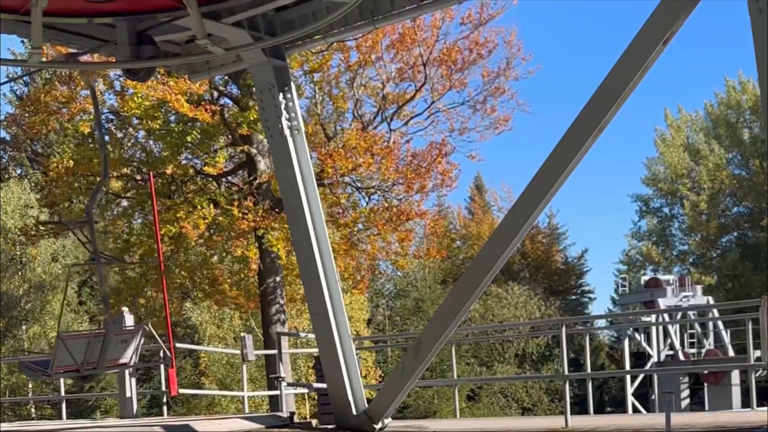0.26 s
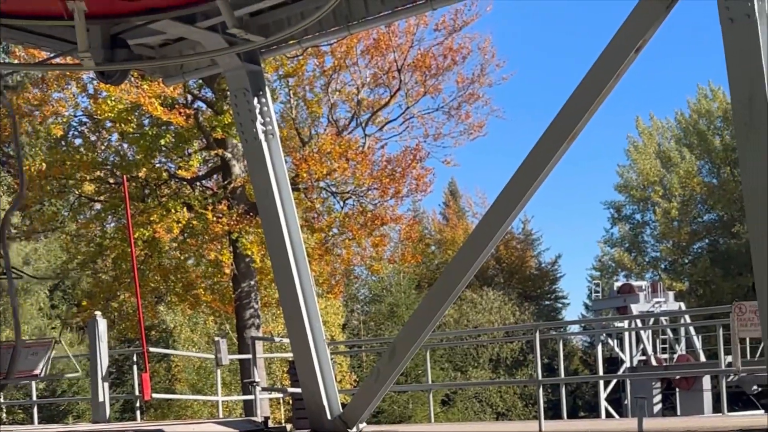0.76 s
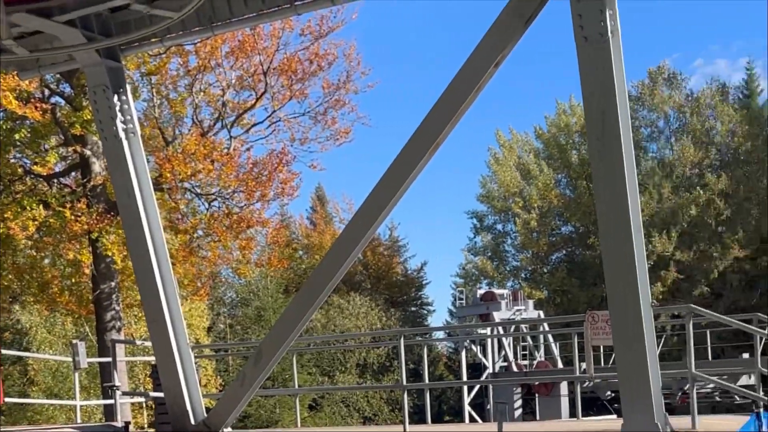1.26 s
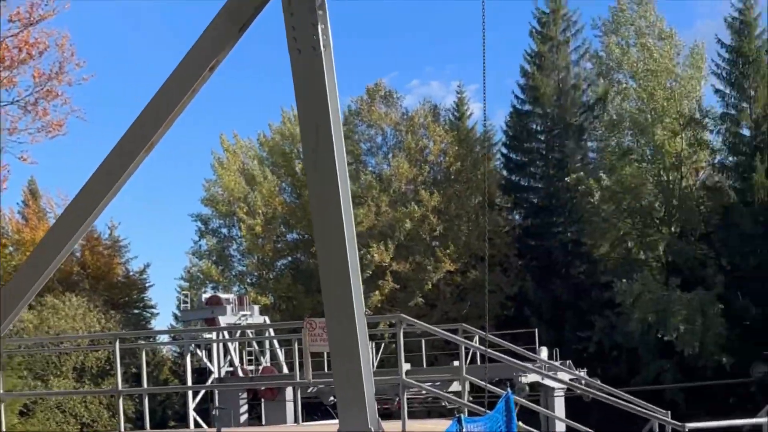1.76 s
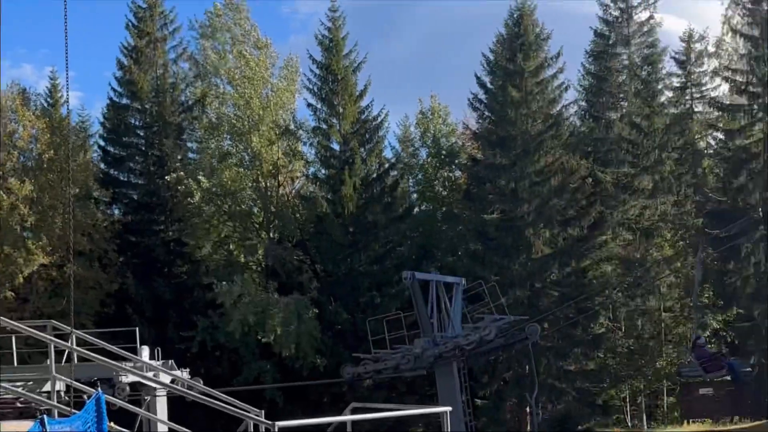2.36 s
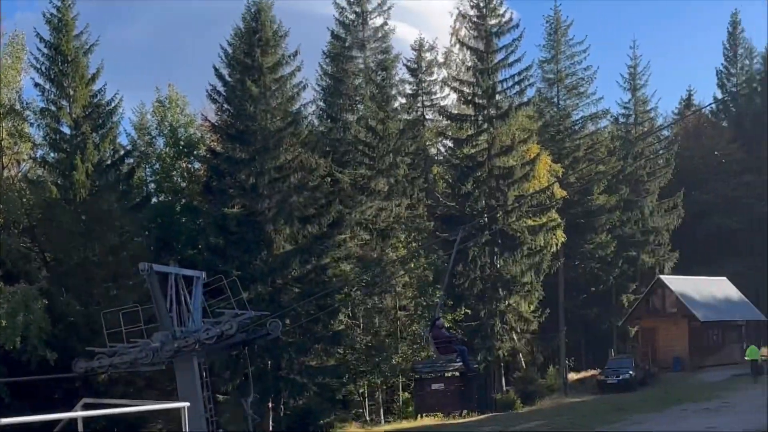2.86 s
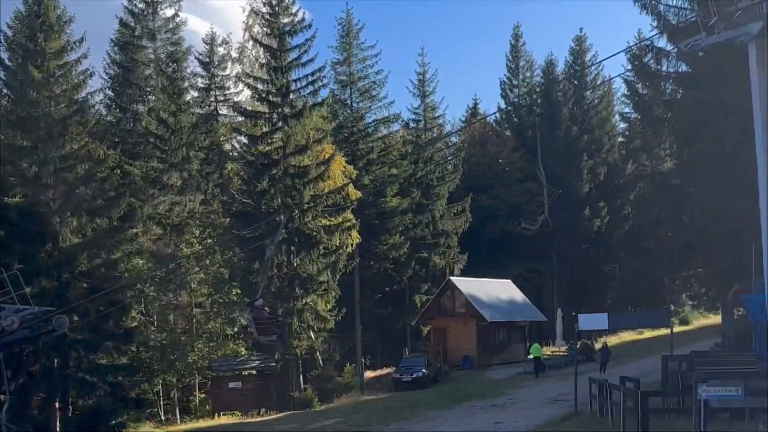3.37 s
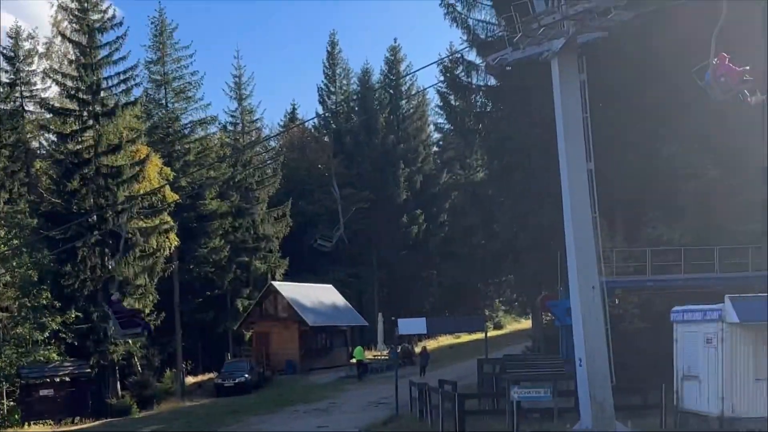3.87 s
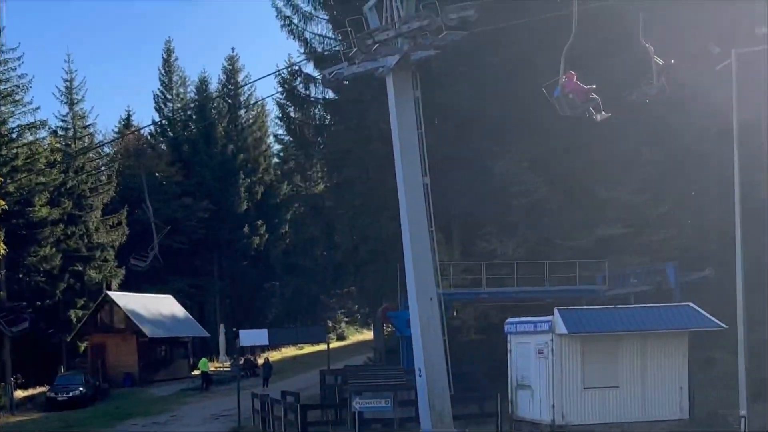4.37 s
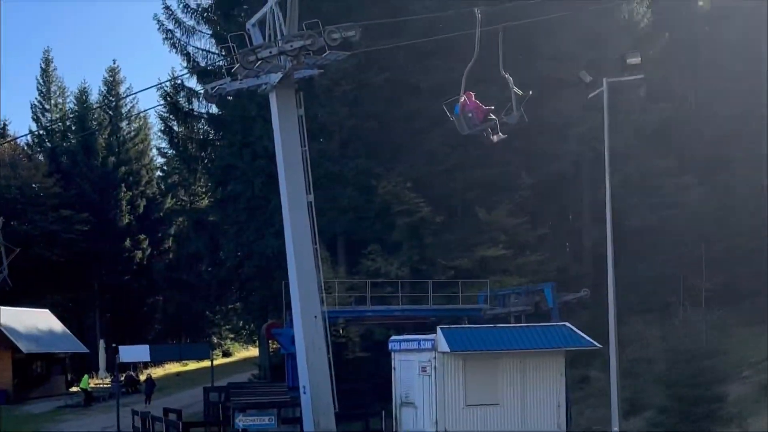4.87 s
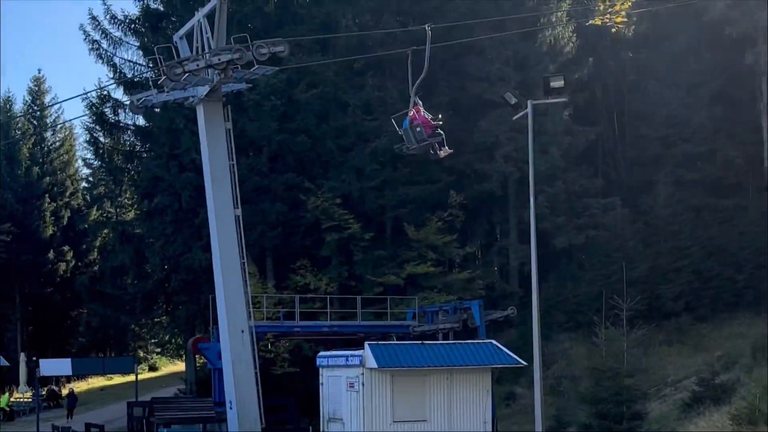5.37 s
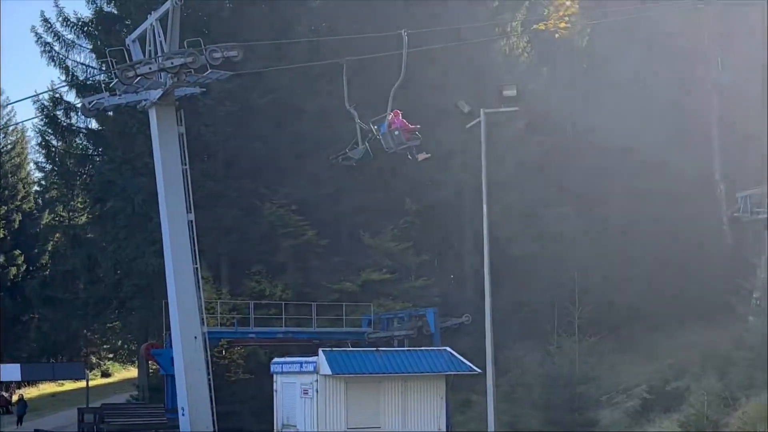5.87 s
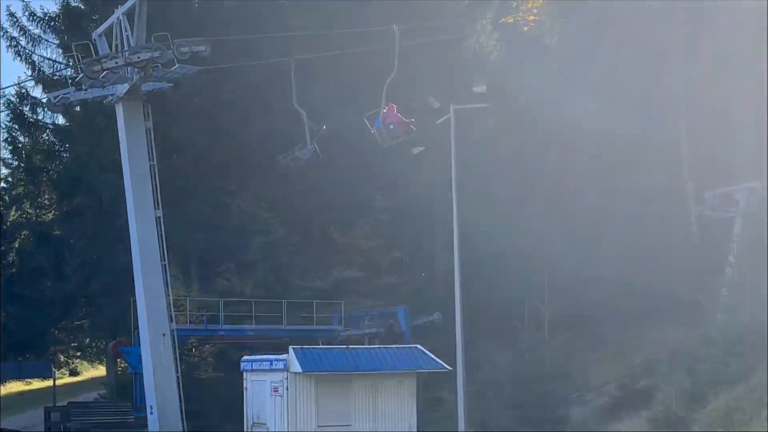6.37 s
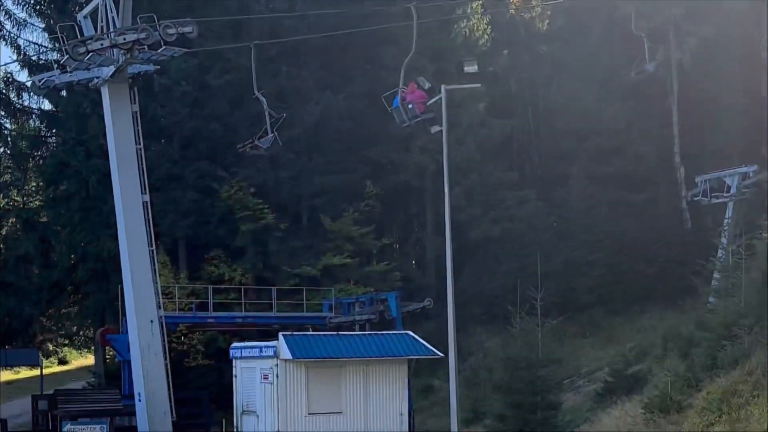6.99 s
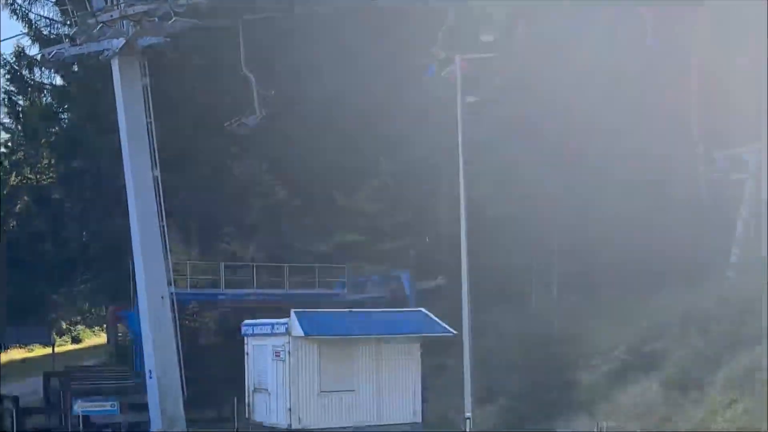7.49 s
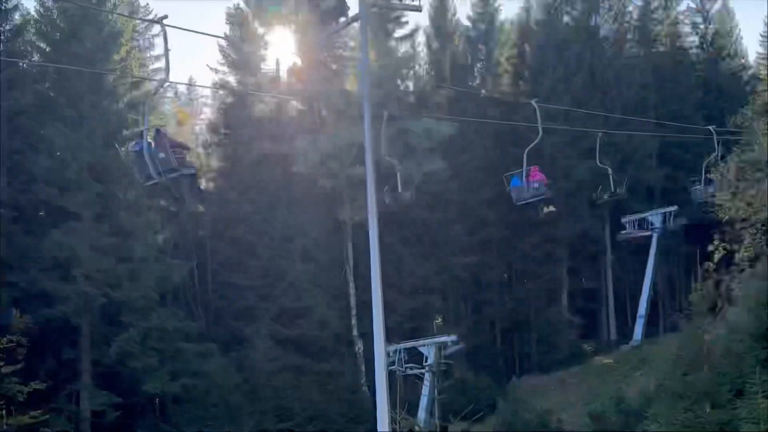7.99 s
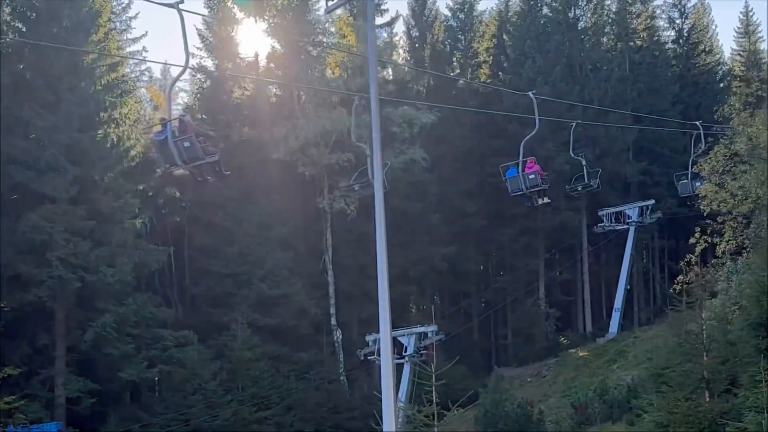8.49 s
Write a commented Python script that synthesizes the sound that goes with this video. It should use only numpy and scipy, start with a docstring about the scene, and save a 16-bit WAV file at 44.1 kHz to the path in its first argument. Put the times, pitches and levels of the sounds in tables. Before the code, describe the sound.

A chairlift motor hums and whirs loudly, shoes scrape grit nearby, then it stops dead with a click, leaving soft rumbling wind.

```python
"""The drive of a chairlift station drones outdoors: sines at multiples of a slowly easing shaft speed.
Steady sines add mains hum and shaped noise adds a broad roar, which dulls as the listener turns away.
Shoes scuff on grit (bursts of noise, ringing pebbles), low wind puffs, and a few short tones squeak.
A hard cut clicks to a spot further off, where lumpy noise makes the wind that buffets both ports.
The two ports are the left and right openings where the sound is picked up."""
import sys
import numpy as np
from scipy import signal
from scipy.fft import rfft, irfft, next_fast_len
from scipy.io import wavfile
from scipy.ndimage import uniform_filter1d, map_coordinates

SR = 44100
rng = np.random.default_rng(int(sys.argv[2]) if len(sys.argv) > 2 else 0)


def master_out(mix):
    """Clip the mix to full scale and print it as 16-bit PCM to the path in sys.argv[1]."""
    frames = np.transpose(np.atleast_2d(mix))
    ceiling = np.clip(frames, -1, 1)
    pcm = np.round(ceiling * 32767).astype(np.int16)
    wavfile.write(sys.argv[1], SR, pcm)


N = 385434

PINION = 4.608  # turns of a faster pinion (small gear) per shaft turn
# how the station's level changes as the listener turns from the drive: (time [s], level change [dB])
TURN = [(0, 0), (.3, -1.5), (1.7, -1), (2.7, -1), (3.4, -0.5), (3.7, -2.5), (4.3, -3.5), (5.0, -4.5),
        (6.5, -5), (7.9, -5)]
# tone colour of airy treble noise: (frequency [Hz], relative level [dB])
AIR = [(3120, -30), (5300, 0.5), (6470, 3), (7840, -2), (9560, -8.5), (10100, -15.5), (11000, -33),
       (11700, -88), (22000, -120)]


def amp(db):
    """Turn decibels into a gain."""
    return 10 ** (np.asarray(db) / 20)


def unit(x):
    """Scale to an rms (average strength) of 1."""
    return x / np.sqrt(np.mean(x ** 2) + 1e-20)


def curves(rows):
    """Join the points of a table with straight lines: one curve for each column after the time."""
    times, *columns = np.transpose(rows)
    return [np.interp(np.arange(N) / SR, times, column) for column in columns]


def wobble(rate):
    """A smooth random curve with the given number of random knots a second."""
    at = np.arange(0, N + 8, 8)  # worked out at every eighth sample, then joined up
    knots = rng.standard_normal(int(N * rate / SR) + 4)
    return np.interp(np.arange(N), at, map_coordinates(knots, [at * rate / SR]))


def coloured(x, points):
    """Shape the spectrum of x by (frequency [Hz], relative level [dB]) points, then scale to rms 1."""
    m = next_fast_len(N + 8192)
    f, db = np.transpose(points)
    log_f = np.log(np.fft.rfftfreq(m, 1 / SR) + 1)
    gain = amp(np.interp(log_f, np.log(f + 1), db, left=-120, right=-120))
    return unit(irfft(rfft(x, m) * gain, m)[:N])


def rush(mid, side, side_db, patchy_db, tied=.5, turn=1.7, source=None):
    """Stereo noise with patches of random gain: a common part, plus a part opposed at the two ports.

    A share (tied) of the opposed part is the common one turned in phase (turn [rad])."""
    source = rng.standard_normal((2, N)) if source is None else source
    z = signal.stft(source, nperseg=512)[2]
    field = rng.standard_normal(z.shape[1:])
    field = uniform_filter1d(uniform_filter1d(field, 5, 0), 10, 1)  # smooth in pitch, then in time
    tied = np.clip(tied, 0, 1)
    z[1] = tied * np.exp(1j * turn) * z[0] + np.sqrt(1 - tied ** 2) * z[1]
    common, opposed = signal.istft(z * amp(patchy_db * unit(field)), nperseg=512)[1][:, :N]
    common = coloured(common, mid)
    opposed = amp(side_db) * coloured(opposed, side)
    return np.array([common + opposed, common - opposed])


def tone(turns, db, hz, waver_db=1.2, jitter_s=0.00017, lag_s=0.000099, scatter=1):
    """An unsteady sine, blurred more the higher it is; its paths to the two ports differ a little."""
    # scatter is the range of the random starting phase, in cycles
    phase = 2 * np.pi * (turns + scatter * rng.random() + hz * jitter_s * wobble(9))
    drift = wobble(0.45)
    lag = 2 * np.pi * hz * lag_s * (1 + 0.13 * drift)
    pan_db = -.3 + 2.5 * np.tanh((hz / 700) ** 2) * drift
    level = np.sqrt(2) * amp(db + waver_db * wobble(4))
    return level * np.sin(phase + np.array([lag, -lag]) / 2) * amp([pan_db, -pan_db])


def hillside():
    """Away from the drive: lumpy wind, unlike at the two ports, over a thin distant roar."""
    # puffs of wind that strike one port more:
    # (time [s], level [dB], low thump level [dB], left minus right [dB], time to fall 60 dB [s])
    puff_table = [(7.948, -16.5, -25, -2, 0.19), (7.968, -8.5, -20, 6, 0.12), (7.986, -17, -21, 2, .1),
                  (8.022, -10, -17, -1, 0.1), (8.06, -17.5, -21, -1, 0.11), (8.086, -21, -24, -4, 0.11),
                  (8.165, -24.5, -27, 2, 0.21), (8.19, -18, -28, 4, .08), (8.21, -17, -12, 5, 0.091),
                  (8.25, -33, -14, -3, 0.18), (8.287, -17, -14, -1, 0.057), (8.328, -14.5, -7.5, -5, 0.1),
                  (8.37, -14, -8, 4, 0.07), (8.405, -28, -16, 3, .08), (8.47, -22.5, -18, -3, 0.18),
                  (8.506, -14.5, -17, 0, 0.09), (8.572, -22, -35, 1, 0.16), (8.612, -21.5, -21, 7, 0.16),
                  (8.655, -24, -26, 2, 0.095)]
    # eddies that push the ports oppositely: (time [s], level [dB])
    eddy_levels = [(7.93, -30), (8.0, -29), (8.09, -26), (8.19, -23), (8.28, -21.5), (8.38, -23),
                   (8.47, -24), (8.55, -25), (8.61, -33), (8.68, -25), (8.74, -24)]
    # tone colours of the low thumps, puffs and eddies: (frequency [Hz], relative level [dB])
    thump_colour = [(18, -38), (30, -19), (60, -0.5), (100, 3.5), (170, -8), (260, -8.5), (400, -34)]
    puff_colour = [(90, -20), (160, 0.5), (300, -0.5), (450, -6.5), (700, -15.5), (1100, -25), (1600, -49),
                   (2400, -64)]
    eddy_colour = [(50, -29), (100, -6.5), (200, 1), (500, -2), (900, -11), (1500, -27.5), (2400, -52)]
    # tone colours of the distant roar, common and opposed: (frequency [Hz], relative level [dB])
    far_mid = [(760, -36), (1300, -2.5), (3330, -9), (3840, -7.5), (5280, -16.5), (6300, -14.5),
               (7040, -16.5), (7850, -21.5), (9500, -25.5), (10700, -38), (11500, -90), (22000, -120)]
    far_side = [(900, -15), (1300, 0), (1800, -10), (4000, -12.5), (4700, -15), (5300, -18), (6600, -26),
                (8000, -25), (10000, -32), (11600, -35), (15400, -39.5), (16500, -80.5)]
    lull_db, far_db = -29.5, -49  # low wind between puffs, distant roar
    rise_s = 0.0087
    tick_s, tick_db = 8.513, -53  # one faint dry tick

    puffs, thumps = np.zeros((2, N)), np.full(N, amp(lull_db))
    for s, db, thump_db, pan_db, t60 in puff_table:
        t = np.maximum(np.arange(N) / SR - s, 0)
        shape = amp(-60 * t / max(t60, .02)) * (1 - np.exp(-t / rise_s))
        puffs += amp(db + pan_db * np.array([[.5], [-.5]])) * shape
        thumps += amp(thump_db) * shape
    wind = thumps * rush(thump_colour, thump_colour, side_db=-6.5, patchy_db=-0.5, tied=.1)
    wind += puffs * rush(puff_colour, puff_colour, side_db=-5.0, patchy_db=1.0, tied=.3)

    eddies = amp(curves(eddy_levels)[0] + 1.5 * wobble(60))
    eddies = eddies * rush(eddy_colour, eddy_colour, side_db=-13, patchy_db=2.0, tied=0.071)
    eddies = eddies * [[1], [-1]]

    since = np.arange(N) / SR - tick_s
    tick = amp(tick_db - 60 * abs(since) / .02) * (since > 0)
    tick = tick * coloured(rng.standard_normal(N), AIR)

    far = amp(far_db + .8 * wobble(25)) * rush(far_mid, far_side, side_db=2.5, patchy_db=.8)
    return wind + eddies + tick + far


def breeze():
    """Low wind over the ports: noise that follows an uneven breeze and short bell-shaped gusts."""
    # gusts on the ports near the drive: (time [s], level [dB])
    gust_table = [(.87, -22), (1.345, -23), (1.47, -31), (3.75, -37), (4.26, -31.5), (4.9, -29),
                  (5.14, -29), (5.39, -33), (5.93, -26), (6.7, -32), (7.1, -34), (7.52, -29)]
    # tone colour of the wind: (frequency [Hz], relative level [dB])
    wind_colour = [(15, -36.5), (30, -6), (50, -1), (80, 0), (130, -15.5), (250, -38.5)]
    breeze_db, rise_s, fall_s = -35, 0.046, 0.063
    t = np.arange(N) / SR
    gusts = 0
    for s, db in gust_table:
        width_s = np.where(t < s, rise_s, fall_s)
        gusts = gusts + amp(db) * np.exp(-((t - s) / width_s) ** 2)
    level = gusts + amp(breeze_db + 2.9 * wobble(6.4))
    return level * rush(wind_colour, wind_colour, side_db=-14.5, patchy_db=-1.0)


def squeaks():
    """Short rubbing tones, perhaps rope on the sheaves: each is rough, glides, swells and fades."""
    # (time [s], length [s], start pitch [Hz], end pitch [Hz], level before panning [dB], roughness [rad])
    squeak_table = [(2.653, .024, 4050, 4230, -41, .9), (2.688, .035, 4980, 5000, -52, 1.2),
                    (2.7, .09, 4150, 4000, -53, 2.5), (2.76, .25, 552, 522, -32, .5),
                    (3.44, .14, 535, 525, -32, .5), (7.05, .75, 562, 560, -41, .6)]
    out = np.zeros(N)
    for s, length, from_hz, to_hz, db, rough in squeak_table:
        part = slice(round(s * SR), round((s + length) * SR))
        u = np.linspace(0, 1, part.stop - part.start)
        glide_hz = from_hz + u * (to_hz - from_hz)
        phase = 2 * np.pi * np.cumsum(glide_hz) / SR + rough * wobble(from_hz / 25)[part]
        out[part] += np.sqrt(2) * amp(db) * np.sin(np.pi * u) ** 0.35 * np.sin(phase)
    return out * [[1.7], [.1]]  # mostly on the left


def shoes():
    """Grit crunches as dense uneven grains under each drag; single pebbles snap with a short ring."""
    # shoes dragging on grit: (start [s], attack [s], hold [s], level [dB], low part level [dB])
    scuff_table = [(0.079, 0.027, 0.024, -47, -40), (0.438, 0.017, 0.018, -51.5, -43),
                   (1.238, 0.15, 0.18, -41, -40.5), (2.454, .01, 0.0035, -41.5, -32.5),
                   (2.686, .02, 0.09, -48.5, -44), (2.789, 0.055, .04, -41.5, -37),
                   (3.136, 0.011, .002, -33.5, -31), (3.152, 0.036, .03, -33, -25),
                   (3.217, .02, 0.03, -36.5, -27.5), (3.248, 0.014, 0.035, -39.5, -30),
                   (3.472, 0.028, 0.051, -52.5, -45), (3.614, .012, 0.0092, -54, -35)]
    # pebbles snapping underfoot:
    # (time [s], level before filter and panning [dB], pitch [Hz], time to fall 60 dB [s])
    pebbles = [(2.4673, -34, 4300, 0.012), (2.829, -38, 6600, 0.012), (2.854, -37, 6500, 0.016),
               (3.1482, -17, 4680, 0.023), (3.1863, -20, 3050, 0.022), (3.184, -22, 1570, .03),
               (3.199, -17, 957, 0.047), (3.203, -13, 494, 0.05), (3.209, -21, 2550, 0.018),
               (3.224, -24, 2400, .02), (3.237, -24, 1200, .025), (3.262, -23, 810, 0.05),
               (3.283, -22, 1000, .04), (3.294, -25, 1500, .025), (3.6294, -35, 2610, 0.016),
               (3.933, -26.5, 4970, 0.016), (3.934, -30, 4050, 0.014)]
    # tone colours of the grit, common and opposed, and of the sole: (frequency [Hz], relative level [dB])
    grit_mid = [(2060, -34.5), (3500, -5.5), (4220, -4), (4740, -8), (5970, -5), (9000, -12.5),
                (10100, -15.5), (11300, -31), (12200, -87), (22000, -120)]
    grit_side = [(2500, -36), (3500, -2), (4630, 2.5), (5300, -6.5), (7000, -14), (9000, -11),
                 (12000, -16.5), (15300, -17), (16500, -60)]
    sole_colour = [(410, -19), (700, 2), (1060, -4), (1830, -6), (2470, -7), (3700, -14.5), (4810, -43.5),
                   (8140, -120)]
    scuff_t60_s = 0.31  # time a drag takes to fall 60 dB

    def grains(depth_db, rate):
        """Noise whose strength flickers at random."""
        return rng.standard_normal((2, N)) * amp(depth_db * wobble(rate))

    grit = rush(grit_mid, grit_side, side_db=1.5, patchy_db=0.5, tied=.7,
                source=grains(depth_db=1.5, rate=580))
    sole = rush(sole_colour, sole_colour, side_db=-5.5, patchy_db=2.5, tied=.6,
                source=grains(depth_db=3.0, rate=250))
    out, t = np.zeros((2, N + SR)), np.arange(N) / SR
    high, low = np.zeros((2, N))
    for s, attack, hold, db, low_db in scuff_table:
        fall = amp(-60 * np.maximum(t - s - attack - hold, 0) / scuff_t60_s)
        drag = np.clip((t - s) / attack, 0, 1) * fall
        # where drags overlap, the louder one is heard
        high = np.maximum(high, amp(db) * drag)
        low = np.maximum(low, amp(low_db) * drag)
    out[:, :N] += high * grit + low * sole

    t = t[:SR // 20]
    dull = signal.butter(6, [400, 9000], "band", fs=SR, output="sos")
    for s, db, hz, t60 in pebbles:
        crack = rng.standard_normal(len(t)) * amp(-60 * t / .005)
        ring = np.sin(2 * np.pi * hz * t) * amp(-60 * t / max(t60, .002))
        snap = amp(db) * signal.sosfilt(dull, ring + .35 * crack)
        start = round(s * SR)
        out[:, start:start + len(t)] += snap * [[1.2], [.1]]  # mostly on the left
    return out[:, :N]


def roar():
    """Bearings, rope and fan: broad noise in four ranges, duller as the listener turns away."""
    # tone colours, common and opposed, from low to high: (frequency [Hz], relative level [dB])
    rumble_mid = [(20, -37), (40, -13), (80, -5), (150, 1.5), (220, 0), (270, -2.5), (330, 0.5), (400, -4),
                  (520, -7), (700, -14.5), (900, -31.5)]
    rumble_side = [(20, -53), (60, -19), (150, -25), (330, -10), (520, -15), (700, -12), (900, -44)]
    roar_mid = [(410, -31.5), (700, -3), (926, -4), (1110, -8), (1200, -11.5), (1230, -10), (1890, -17),
                (2120, -14.5), (3200, -18.5), (4160, -53), (7040, -120)]
    roar_side = [(410, -28.5), (700, -7.5), (1110, -8.5), (1200, -10.5), (1570, -17.5), (1910, -20.5),
                 (2120, -15.5), (2560, -13.5), (3200, -20), (4160, -34.5), (7040, -120)]
    hiss_mid = [(1760, -25), (3000, -10), (3420, 1.5), (4210, -1.5), (4570, -4.5), (5400, -12),
                (7020, -41.5), (11900, -120)]
    hiss_side = [(2400, -31.5), (3000, -3.5), (3300, -4), (4100, -6), (4750, -7), (5000, -4.5), (5200, -19),
                 (6000, -50.5)]
    air_side = [(4500, -27), (5200, 0.5), (6500, -5.5), (8000, -8), (9500, -11.5), (12000, -21),
                (15500, -23.5), (16500, -61)]
    # levels when facing the drive
    rumble_db, roar_db, hiss_db, air_db = -23, -34, -46.5, -48
    # dB of change per dB of TURN: the treble is shadowed most
    rumble_turns, roar_turns, hiss_turns, air_turns = 0.36, 0.61, 0.67, 1.65

    turn_db, = curves(TURN)
    shake = wobble(9)  # shared by the three upper ranges
    rumble_level = amp(rumble_db + rumble_turns * turn_db + 1.2 * wobble(6))
    roar_level = amp(roar_db + roar_turns * turn_db + 0.31 * shake)
    hiss_level = amp(hiss_db + hiss_turns * turn_db + 0.28 * shake)
    air_level = amp(air_db + air_turns * turn_db + 0.69 * shake)
    out = rumble_level * rush(rumble_mid, rumble_side, side_db=-7.5, patchy_db=1.5, tied=0.6, turn=0.98)
    out += roar_level * rush(roar_mid, roar_side, side_db=-0.5, patchy_db=1.2, tied=.52, turn=1.64)
    out += hiss_level * rush(hiss_mid, hiss_side, side_db=1.7, patchy_db=1.75, tied=.55, turn=1.4)
    return out + air_level * rush(AIR, air_side, side_db=-1.3, patchy_db=1.5, tied=.6, turn=1.8)


def hum():
    """The motor's rectifier hums at six times the 50 Hz mains, whatever the speed."""
    # (multiple of 300 Hz, level [dB])
    harmonics = [(1, -33), (2, -48), (3, -54), (4, -59), (6, -63), (7, -63), (8, -63), (9, -65)]
    turns = 300 * np.arange(N) / SR
    return sum(tone(round(k) * turns, db, k * 300, waver_db=4.5, jitter_s=.00003) for k, db in harmonics)


def shrill(turns):
    """High pinion orders, thin and unsteady, partly cancelling between the ports."""
    # high multiples of the pinion speed
    orders = [28, 29, 36]
    # as the listener turns they reach the ports more or less out of step:
    # (time [s], then level [dB] and phase gap [rad] for each order)
    path_table = [(0, -49, 2.3, -50, .8, -49, 2.7), (.6, -47, 2.4, -48.5, .9, -50, 2.4),
                  (1.0, -47, 2.9, -48, 1.1, -49, 2.5), (1.45, -49, 2.7, -51, .9, -51, 2.4),
                  (1.75, -47, 1.5, -56, 1.8, -51, 1.3), (2.2, -49, 1.5, -49, 1.5, -51, 2.1),
                  (2.6, -56, 1.6, -47, 1.7, -52, 2.3), (3.0, -57, 2.5, -48, 2.1, -54, 2.8),
                  (3.5, -57, 1.5, -49, 1.5, -55, 2), (4.2, -57, 1, -52.5, .8, -51, 2.9),
                  (4.7, -59, 1.2, -50, 1.1, -53, 2.4), (5.1, -61, 1.2, -52, 1, -51, 2.4),
                  (5.45, -58, 1.4, -52, 1.9, -55, 1.5), (5.8, -58, 1, -52, 2.3, -48, 2.5),
                  (6.2, -62, .6, -53, .9, -47, 2.6), (6.6, -63, 1.5, -58, 1.5, -55, 1.6),
                  (7.0, -56, 1.7, -53, 2.1, -58, 2.6), (7.9, -58, 1.2, -57, 2.2, -60, 2)]
    path, out = curves(path_table), 0
    for k, db, gap in zip(orders, path[::2], path[1::2]):
        phase = 2 * np.pi * (k * PINION * turns + rng.random() + .1 * wobble(12))
        level = np.sqrt(2) * amp(db + 3 * wobble(5))
        out = out + level * np.sin(phase + np.array([gap, -gap]) / 2)
    return out


def gears():
    """Teeth mesh at multiples ("orders") of the shaft speed; the frame favours others as it slows."""
    # (time [s], shaft speed [Hz])
    shaft = [(0, 16.27), (.8, 16.29), (1.2, 16.27), (1.6, 16.17), (2.05, 16.06), (2.4, 16.01),
             (2.75, 15.92), (3, 15.87), (3.4, 15.84), (4.2, 15.85), (5, 15.9), (5.8, 15.92), (6.2, 15.89),
             (6.6, 15.84), (7.4, 15.8), (8, 15.79)]
    # the two loudest shaft orders swell slowly: (time [s], sixth order level [dB], ninth order level [dB])
    drone = [(0, -26.5, -15.5), (.8, -25, -12), (1.3, -25, -17), (1.7, -21.5, -12), (2.5, -22.5, -13.5),
             (3.0, -27, -10.5), (3.4, -20, -13), (4.1, -21, -11.5), (4.8, -17.5, -14.5), (5.4, -18.5, -15),
             (6.3, -22.5, -15), (6.6, -20.5, -16), (7.0, -22, -11.5), (7.4, -19, -14), (7.9, -21, -15)]
    # the pinion's ninth order, a clear tone that swells and sinks: (time [s], level [dB])
    sing = [(0, -51), (1.2, -53), (2.0, -39), (3.0, -37), (3.7, -38), (4.4, -41.5), (5.1, -38.5),
            (5.8, -33), (6.6, -34.5), (7.2, -42.5), (7.9, -46)]
    # shaft orders of middling strength
    middle = [8, 10, 18, 20.25, 21, 24]
    # their slow swells: (time [s], then level [dB] of each middle order)
    middle_levels = [(0, -28, -38, -40, -29, -26, -37), (.75, -33, -36, -31, -30, -20, -41),
                     (1.25, -35, -33, -31, -30, -22, -37), (1.75, -30, -27, -28, -26, -29, -30),
                     (2.25, -27, -25, -25, -24, -33, -30), (2.75, -26, -25, -32, -25, -28, -31),
                     (3.25, -27, -27, -38, -25, -34, -31), (3.75, -30, -30, -35, -27, -28, -29),
                     (4.25, -28, -31, -33, -25, -30, -34), (5, -27.5, -27.5, -31, -27.5, -34, -38),
                     (5.75, -29, -32, -30, -28, -32, -38), (6.25, -29, -34, -31, -27, -28, -36),
                     (6.75, -26, -28, -35, -28, -27, -40), (7.25, -27, -33, -37, -33, -25, -39),
                     (7.9, -30, -36, -36, -32, -24, -34)]
    # shaft orders that slide across a narrow peak of the frame
    swept = [16 * PINION]
    # one row each: (level away from the peak [dB], peak centre [Hz], half width [Hz],
    # gain at the centre [dB], change per dB of TURN [dB])
    swept_peaks = [(-57.5, 1173.5, 6.2, 15.5, 1.5)]
    # weaker multiples of the shaft speed; quarters come from a 4:1 reduction gear
    minor = [4, 4.75, 5, 7, 8.75, 9.25, 9.5, 10.75, 11, 11.25, 12, 12.25, 13, 13.75, 14.25, 15, 16.25,
             17.75, 18.75, 19, 19.75, 20, 20.75, 21.5, 23, 23.75, 27, 28.5, 30, 33, 35.5, 38]
    # one row each: (level at high speed [dB], level at low speed [dB])
    minor_levels = [(-53, -39.5), (-43.5, -47.5), (-42.5, -45), (-29.5, -29.5), (-33.5, -40.5), (-33, -42),
                    (-33, -30.5), (-28, -39), (-31, -37), (-38, -41), (-32, -36), (-38.5, -38.5),
                    (-44, -37), (-43, -42.5), (-35, -34), (-42, -35), (-36.5, -47), (-38, -47), (-32, -36),
                    (-35, -30), (-25.5, -42), (-32, -39), (-42, -35), (-45, -35), (-37, -44), (-33, -35.5),
                    (-43, -39.5), (-43.5, -49.5), (-42.5, -41), (-64, -47), (-59.5, -48), (-59, -47)]
    # weaker multiples of the pinion speed
    whine = [8, 10, 20, 24, 38, 39]
    # one row each: (level at high speed [dB], level at low speed [dB])
    whine_levels = [(-49.5, -52.5), (-62, -51), (-55, -60.5), (-53, -71), (-67.5, -65), (-53, -63.5)]
    fast_hz, slow_hz = 16.25, 15.92  # shaft speeds
    # the ninth order nearly cancels as it slides through this pitch
    null_hz, null_width_hz, null_db = 144.36, .25, -19
    sing_order = 9 * PINION

    shaft_hz, = curves(shaft)
    turns = np.cumsum(shaft_hz) / SR
    fast = np.clip((shaft_hz - slow_hz) / (fast_hz - slow_hz), 0, 1)
    turn_db, = curves(TURN)

    def near(k, centre_hz, width_hz):
        """1 when order k is at the centre pitch, falling towards 0 away from it."""
        return 1 / (1 + ((k * shaft_hz - centre_hz) / width_hz) ** 2)

    def scatter(k):
        """How far apart the orders may start, in cycles."""
        # a slightly off-centre wheel swells the ninth order once a turn, so its neighbours keep in step
        if k in (8, 9, 10):
            return .2
        # these keep in step too, so they throb together once per turn of the reduction gear
        return .3 if 18 <= k <= 22 else 1

    sixth_db, ninth_db = curves(drone)
    ninth_db = ninth_db + null_db * near(9, null_hz, null_width_hz)
    out = 0
    for k, db in [(6, sixth_db), (9, ninth_db)]:
        out = out + tone(k * turns, db, k * slow_hz, waver_db=0.05, jitter_s=.00005, scatter=scatter(k))
    out += tone(sing_order * turns, curves(sing)[0], sing_order * slow_hz, waver_db=1.0, jitter_s=.00002)
    for k, db in zip(middle, curves(middle_levels)):
        out += tone(k * turns, db, k * slow_hz, waver_db=1.0, jitter_s=.00004, scatter=scatter(k))
    for k, (db, centre_hz, width_hz, gain_db, shadow) in zip(swept, swept_peaks):
        level_db = db + gain_db * near(k, centre_hz, width_hz) + shadow * turn_db
        out += tone(k * turns, level_db, k * slow_hz, waver_db=2.1, jitter_s=.00002, scatter=scatter(k))
    for k, (high_db, low_db) in zip(minor, minor_levels):
        level_db = low_db + fast * (high_db - low_db)
        out += tone(k * turns, level_db, k * slow_hz, waver_db=2.5, jitter_s=.00008, scatter=scatter(k))
    # the pinion sits off to one side, so its whine reaches the ports further apart
    for k, (high_db, low_db) in zip(PINION * np.array(whine), whine_levels):
        level_db = low_db + fast * (high_db - low_db)
        out += tone(k * turns, level_db, k * slow_hz, waver_db=4.0, jitter_s=.00005, lag_s=0.00013)
    return out + shrill(turns)


def scene():
    """The station is cut off dead well off the zero of its wave, which clicks; the hillside fades in."""
    # balance of the station as the listener turns: (time [s], left minus right [dB])
    lean = [(0, -0.5), (1.2, -0.9), (2.2, 0.1), (3.4, -0.4), (4.5, 0.5), (5.1, -0.3), (7.9, -0.2)]
    cut_s, step = 7.9278, .21  # rough time of the cut, and the wave height sought there
    fade_s, fade_curve = 0.052, 0.69  # fade-in after the cut, and its power
    lean_db, = curves(lean)
    station = (gears() + hum() + roar()) * amp([lean_db / 2, -lean_db / 2])
    station = station + breeze() + shoes() + squeaks()
    # search 5 ms for the sample whose height is nearest to the step
    start = round((cut_s - .0025) * SR)
    height = abs(station[:, start:start + SR // 200].mean(0))
    cut = start + np.argmin(abs(height - step))
    since = (np.arange(N) - cut) / SR
    return station * (since < 0) + hillside() * np.clip(since / fade_s, 0, 1) ** fade_curve


def record(dry):
    """Peaks clip softly at full scale; then nothing passes at or above the band limit."""
    top_hz = 15750
    x = dry / (1 + np.abs(dry) ** 8) ** (1 / 8)
    m = next_fast_len(N + 8192)
    return irfft(rfft(x, m) * (np.fft.rfftfreq(m, 1 / SR) < top_hz), m)[:, :N]


dry = scene()
out = record(dry)
master_out(out)
```